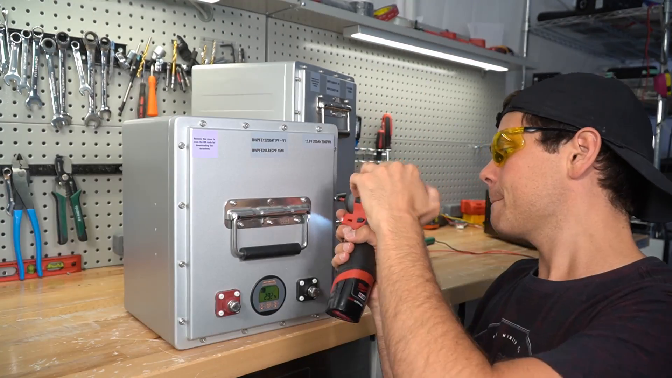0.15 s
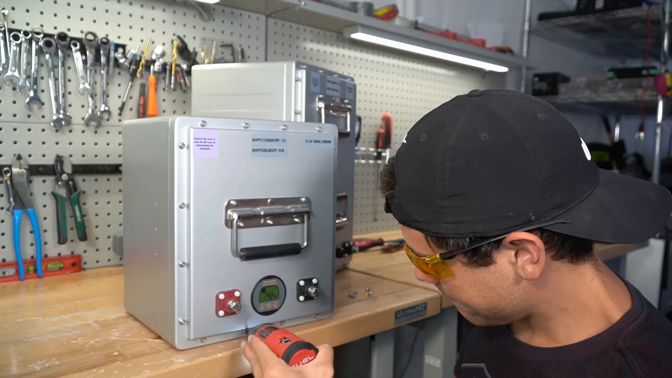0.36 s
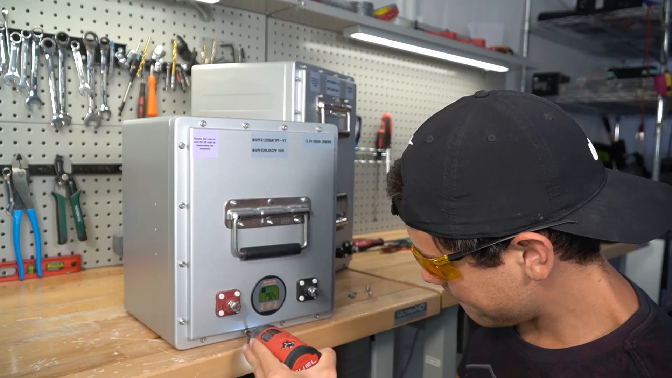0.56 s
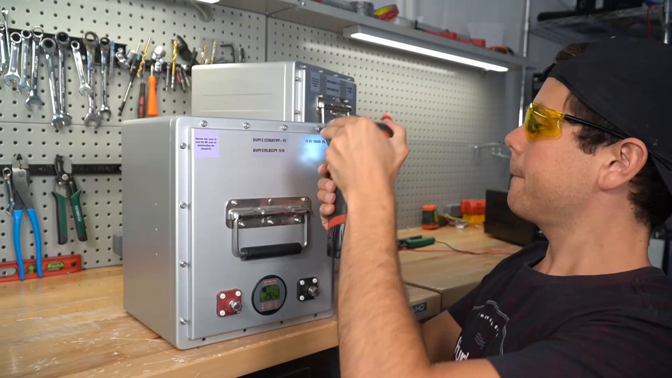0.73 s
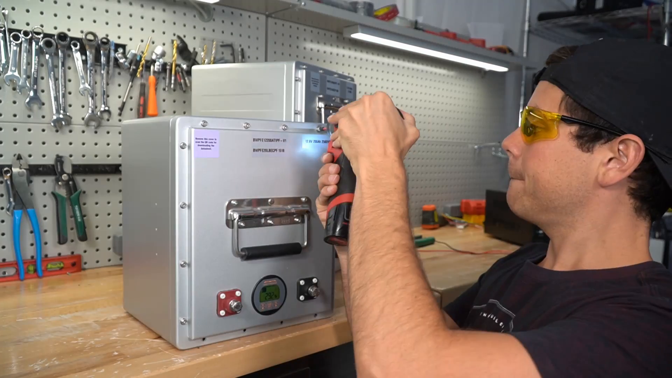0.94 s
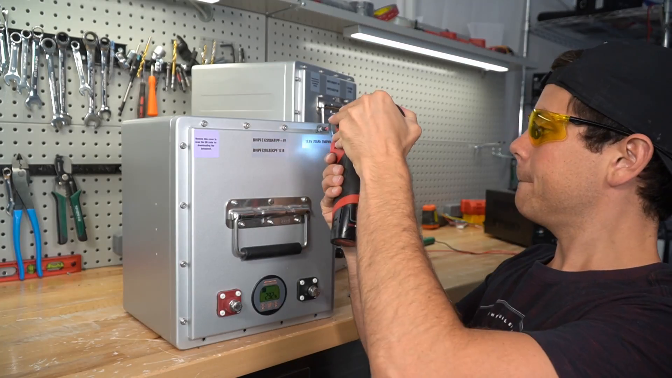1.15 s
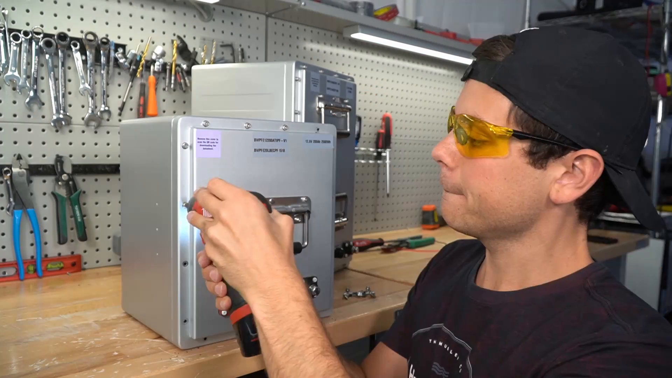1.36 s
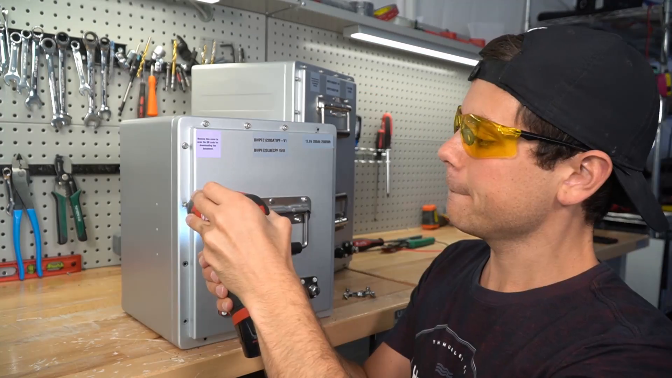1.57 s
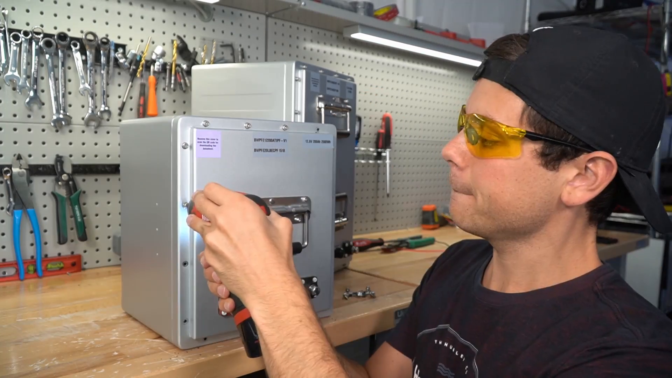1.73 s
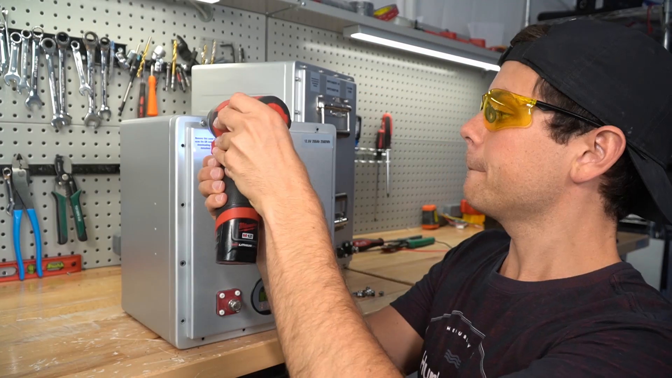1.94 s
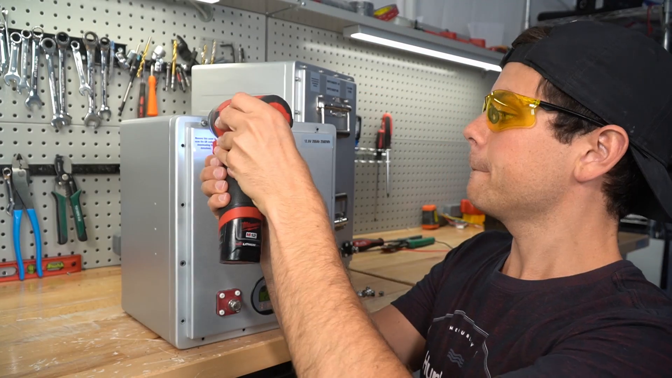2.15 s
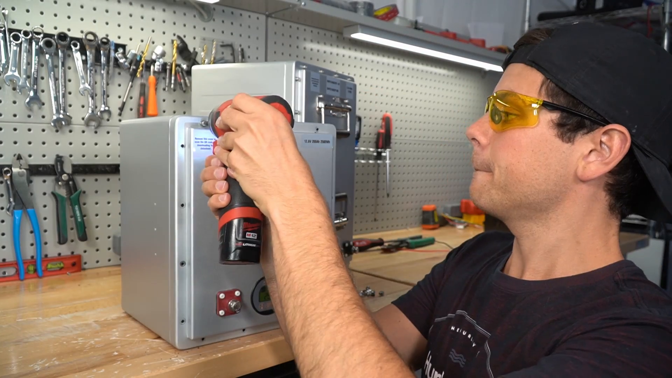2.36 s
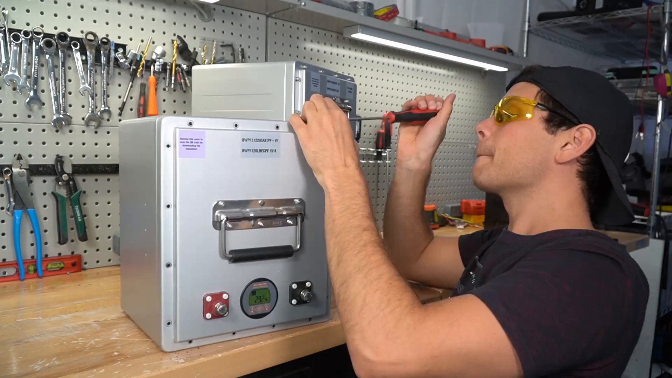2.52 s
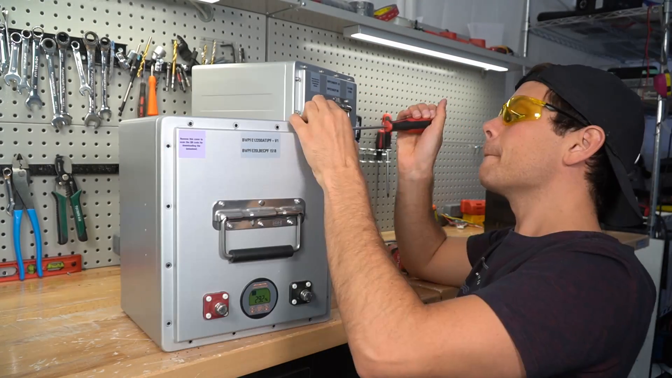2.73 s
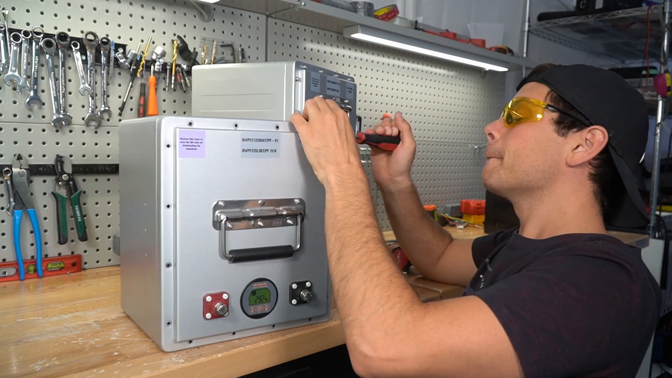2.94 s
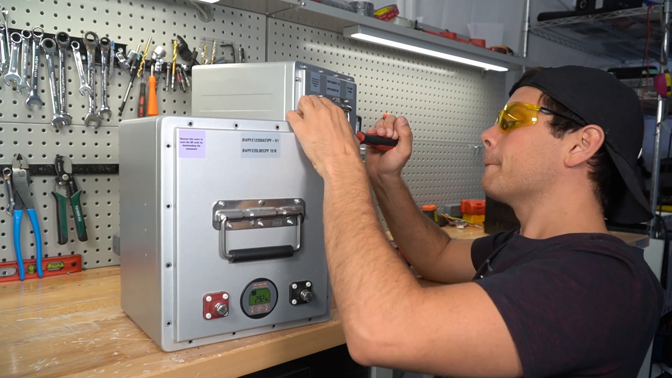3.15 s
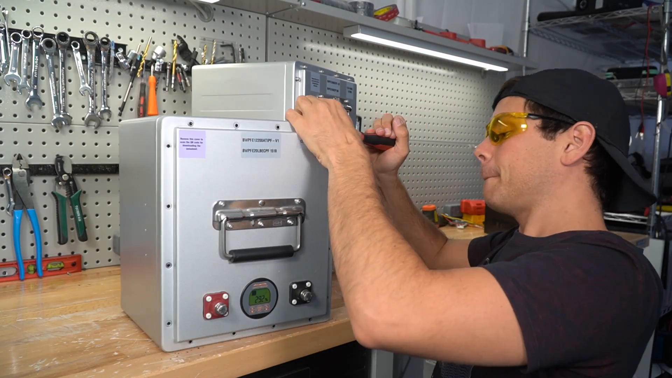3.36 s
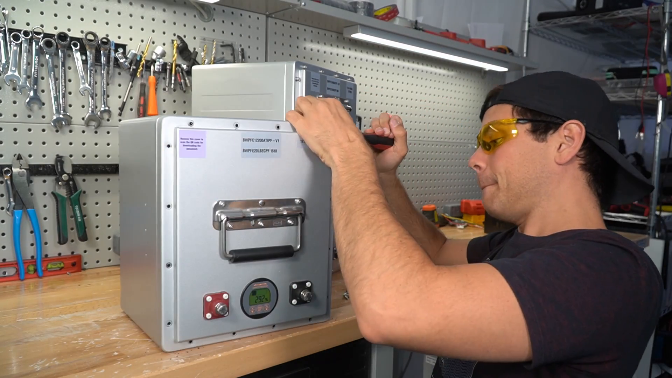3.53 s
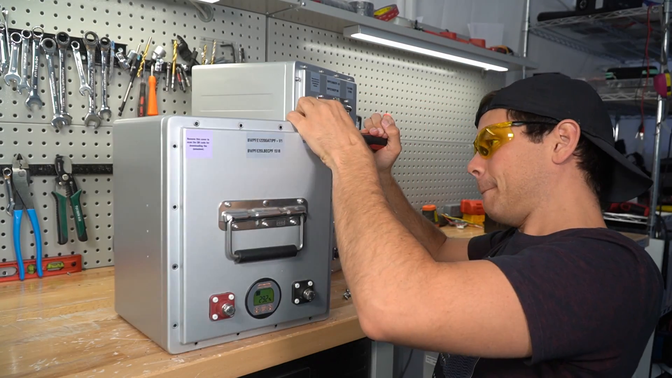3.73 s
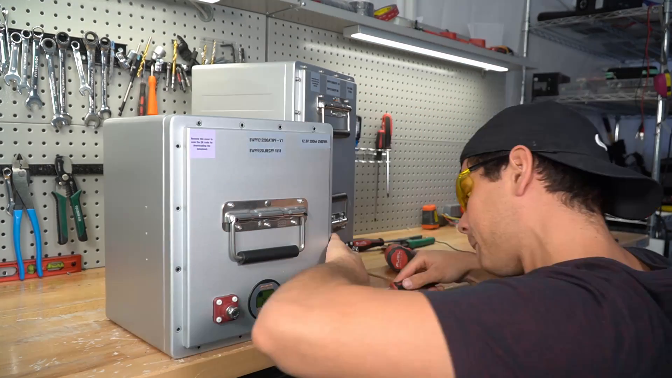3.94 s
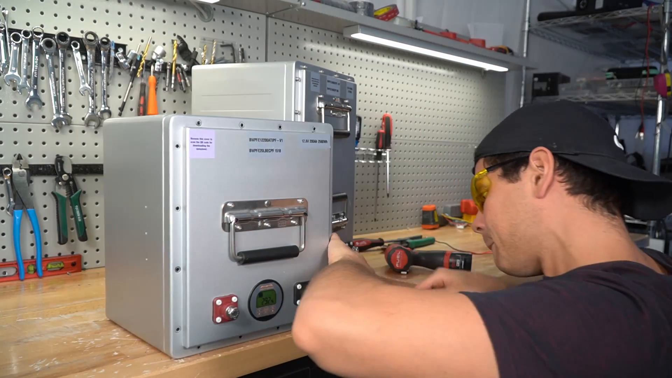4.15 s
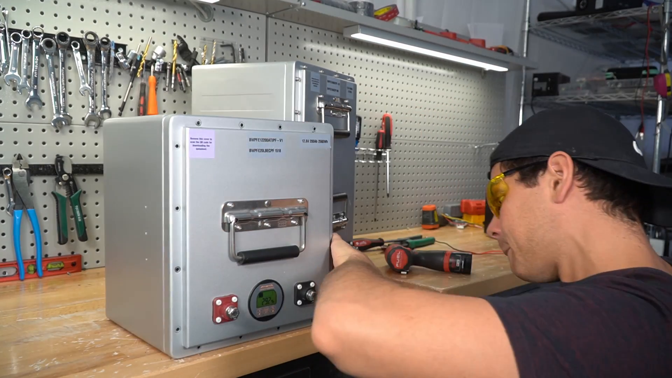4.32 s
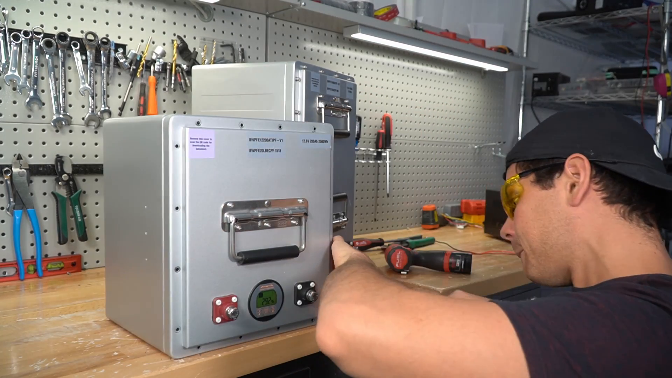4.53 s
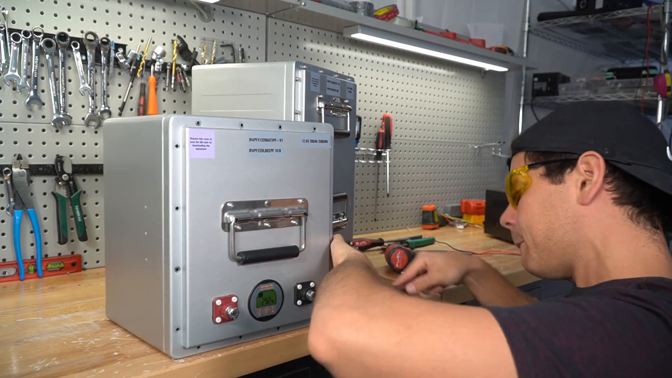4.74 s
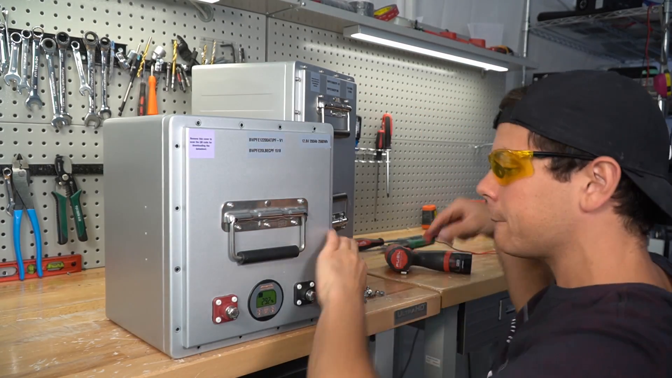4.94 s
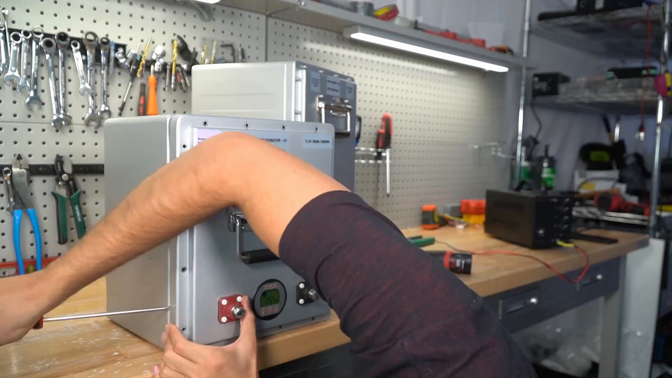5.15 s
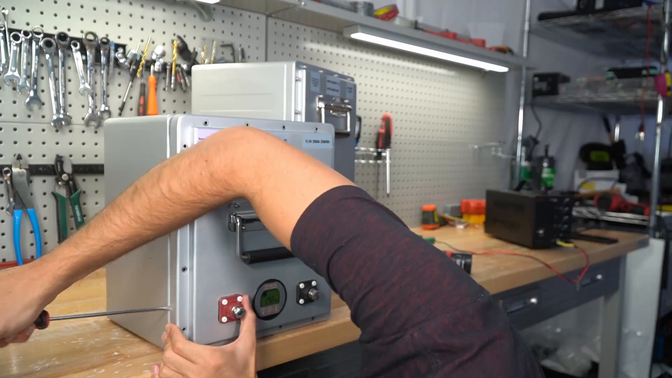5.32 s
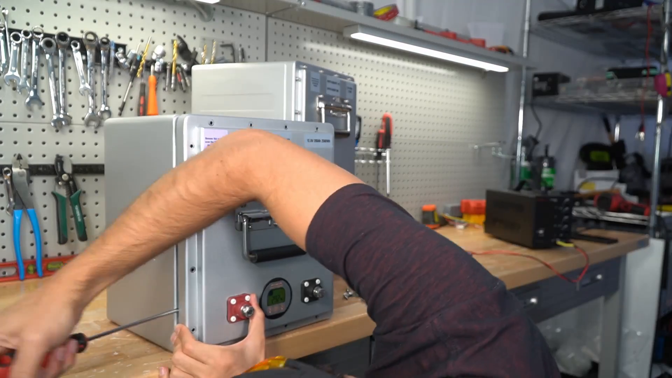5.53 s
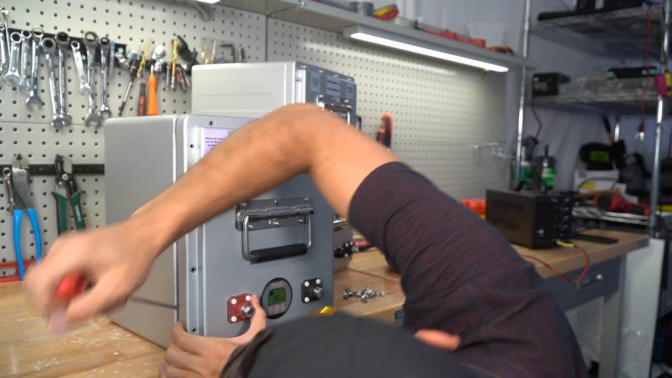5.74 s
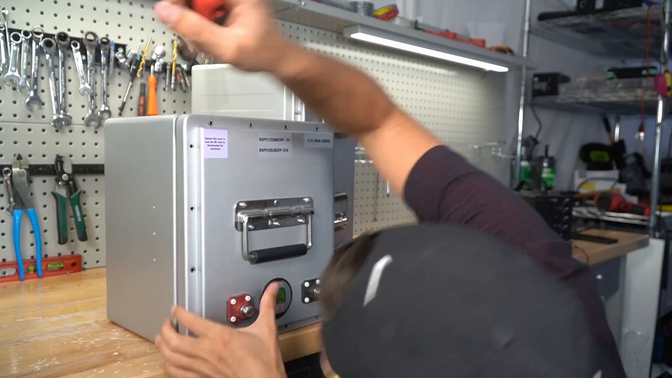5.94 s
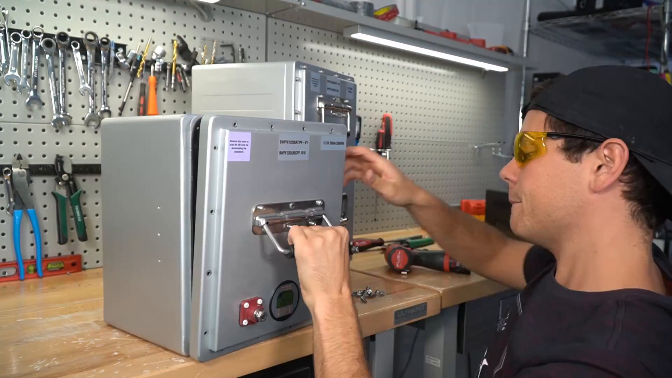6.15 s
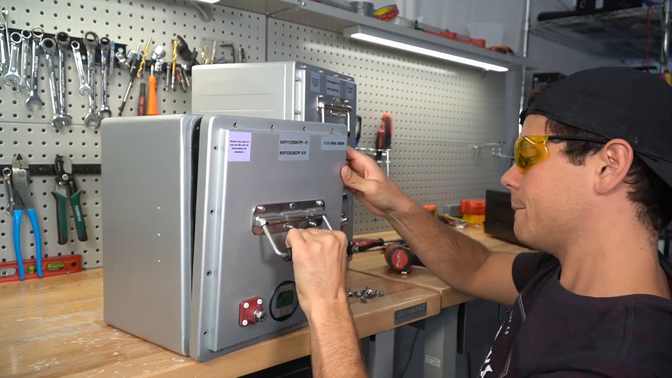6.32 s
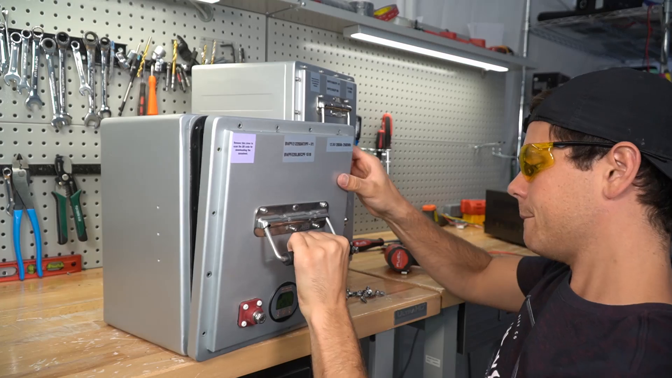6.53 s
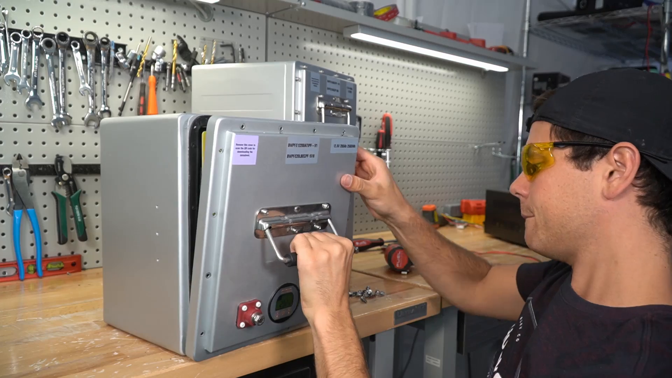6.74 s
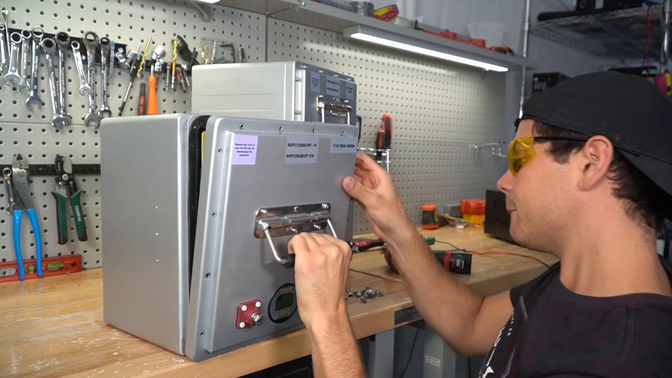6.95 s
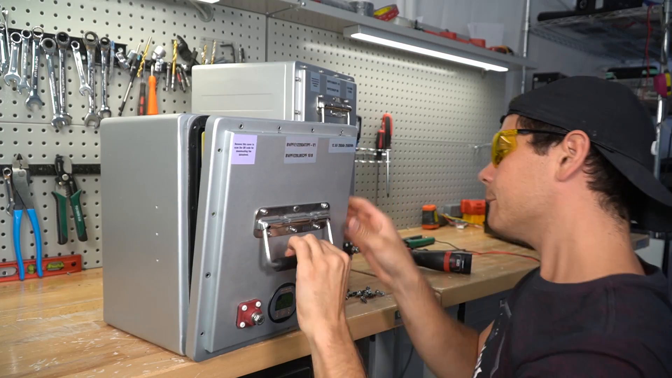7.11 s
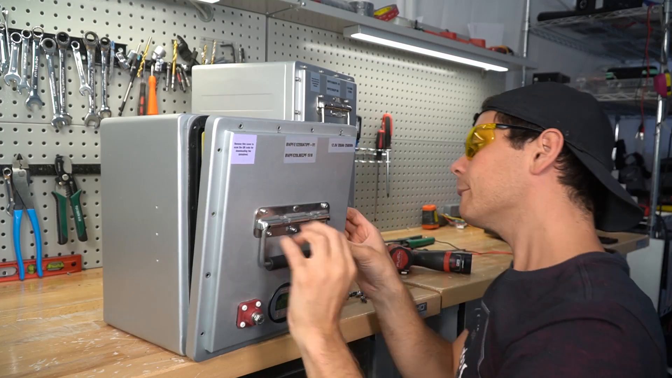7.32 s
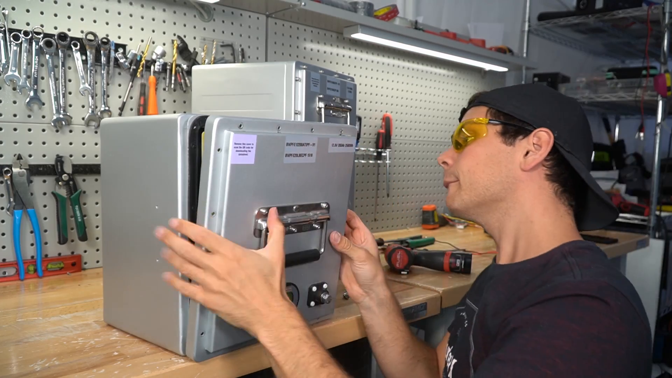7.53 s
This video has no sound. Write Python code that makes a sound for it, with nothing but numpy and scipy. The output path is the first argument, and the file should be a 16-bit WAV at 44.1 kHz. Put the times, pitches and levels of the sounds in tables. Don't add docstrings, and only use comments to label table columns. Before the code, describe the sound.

Five short cordless drill bursts rattle and whine with hard knocks, then a metallic slap, screwdriver taps, dropped screws, prying clicks and a loud panel knock.

```python
import sys
import numpy as np
from scipy import signal
from scipy.fft import rfft, irfft
from scipy.io import wavfile
from scipy.ndimage import uniform_filter1d

SR = 44100
rng = np.random.default_rng(int(sys.argv[2]) if len(sys.argv) > 2 else 0)


def waveform_to_disk(signal):
    frames = np.transpose(np.atleast_2d(signal))
    scaled = np.clip(frames, -1, 1) * 32767
    samples = np.round(scaled).astype(np.int16)
    wavfile.write(sys.argv[1], SR, samples)


def to_linear_factor(level_db):
    exponent = np.asarray(level_db, float) / 20
    return 10 ** exponent


N = 334301


def evened(x):
    return x / np.sqrt(np.mean(x ** 2) + 1e-20)


def read(points, hz):
    f, value = np.transpose(points)
    return np.interp(np.log(hz + 1), np.log(f + 1), value)


def add(mix, s, sound):
    part = mix[round(s * SR):][:len(sound)]
    part += sound[:len(part)]


def band(x, lo_hz, hi_hz):
    sos = signal.butter(2, [lo_hz, min(hi_hz, SR / 2 - 100)], "bandpass", fs=SR, output="sos")
    return signal.sosfilt(sos, x)


def coloured(x, points, peaks=()):
    hz = np.fft.rfftfreq(len(x), 1 / SR)
    db = read(points, hz)
    for f, width, height_db in peaks:
        db = db + height_db / (1 + (2 * (hz - f) / width) ** 2)
    return irfft(rfft(x) * to_linear_factor(db), len(x))


def drift(size, rate_hz):
    low = signal.butter(2, rate_hz, fs=SR, output="sos")
    return evened(signal.sosfilt(low, rng.standard_normal(size + 4000))[4000:])


# f/Hz, level/dB
SHELL = [(59, -21), (100, -2.5), (2900, -0.5), (3750, 8.5), (5200, -0.5), (8300, 1), (10500, -5.5),
         (16000, -21)]
ORDERS_PER_TURN = 9
FULL_MESH_HZ = 2000


def gear_rattle(mesh_hz, turns, colour, panel, hiss):
    size = len(mesh_hz)
    lumps = to_linear_factor(1.0 * drift(size, 69)) * (1 + 0.087 * np.cos(turns / ORDERS_PER_TURN))
    rattle = coloured(coloured(lumps * rng.standard_normal(size), SHELL), colour, panel)
    rumble_gain = 0.87 * (mesh_hz / mesh_hz.max()) ** 5 - 1
    rattle += band(rattle, 70, 660) * np.clip(rumble_gain, -.9, 1)
    hiss_gain = (np.sqrt(mesh_hz / mesh_hz.mean()) - 1) * hiss
    rattle += band(rattle, 3500, 13000) * np.maximum(hiss_gain, -.9)
    return evened(rattle)


ORDERS = [1 / 9, .4, .645, 1, 1.285, 8, 2, 2.36, 2.53, 3, 3.57, 4, 4.5, 5, 6, 7]


def gear_whine(mesh_hz, turns, whine_db, panel, orders_db, least_db):
    size = len(mesh_hz)
    wobble = .44 * np.sqrt(mesh_hz / FULL_MESH_HZ) * drift(size, 45)
    whine = np.zeros(size)
    for order, db in zip(ORDERS, orders_db):
        flicker = to_linear_factor(db + 3.5 * drift(size, 28))
        whine += flicker * np.cos(order * (turns + wobble) + .7 * drift(size, 40))
    whine = evened(coloured(whine, SHELL, panel)) * np.clip(mesh_hz / 400, 0, 1)
    whine /= 1 + np.maximum(np.gradient(mesh_hz) * SR, 0) / 30000
    return whine * (mesh_hz / mesh_hz.max()) ** .8 * to_linear_factor(np.clip(whine_db, least_db, 3.5))


def speed_control(t, mesh_hz, turns):
    commutation = 6 * turns / ORDERS_PER_TURN
    whistle = 0.25 + np.cos(commutation) + 0.2 * np.cos(2 * commutation)
    whistle *= np.cos(2 * np.pi * 9940 * t)
    pull_db = 8 * np.minimum(mesh_hz / 550, 1) ** 2
    full_trigger_db = -20 * (mesh_hz / FULL_MESH_HZ) ** 3
    return whistle * to_linear_factor(-45 + pull_db + full_trigger_db + 2.5 * drift(len(t), 22))


def drill_burst(rows, whine_db, colour, panel, orders_db, hiss, least_db, bit_db):
    s, speed, level_db = np.transpose(rows)
    t = np.arange(s[0], s[-1], 1 / SR)
    whirr_db = np.interp(t, s, level_db)
    mesh_hz = uniform_filter1d(np.interp(t, s, speed), size=900)
    turns = 2 * np.pi * np.cumsum(mesh_hz) / SR
    rattle = gear_rattle(mesh_hz, turns, colour, panel, hiss)
    whine = gear_whine(mesh_hz, turns, whine_db, panel, orders_db, least_db)
    bit_level = to_linear_factor(bit_db + 3 * drift(len(t), 25))
    bit = bit_level * np.cos(2 * np.pi * 3625 * t + 1.2 * drift(len(t), 20))
    body = evened(rattle + whine + bit)
    start_s, stop_s = .008, .003
    fade_in = (t - t[0] + (t[0] < start_s)) / start_s
    edge = np.clip(np.minimum(fade_in, (t[-1] - t) / stop_s), 0, 1)
    return (to_linear_factor(whirr_db) * body + speed_control(t, mesh_hz, turns)) * edge


# t/s, mesh f/Hz, whirr level/dB
BURSTS = [
    [(0, 1456, -17), (.04, 1477, -13.5), (.1, 1495, -19.5), (.14, 1500, -19), (.18, 1340, -19.5),
     (.226, 1272, -20.5)],
    [(.306, 210, -27.5), (.37, 563, -21.5), (.425, 733, -23.5), (.5, 767, -23.5), (.535, 1004, -18),
     (.565, 1624, -17), (.6, 1844, -18.5), (.68, 1969, -19.5), (.768, 1849, -21)],
    [(.918, 616, -24.5), (.975, 1043, -18.5), (1.018, 1329, -17.5), (1.045, 1584, -18.5), (1.11, 1729, -18),
     (1.22, 1840, -19), (1.345, 1713, -19.5), (1.394, 1700, -25)],
    [(1.396, 556, -23.5), (1.49, 587.4, -27), (1.56, 572, -24.5), (1.62, 497.3, -23), (1.655, 548.6, -26.5),
     (1.72, 496.6, -22), (1.755, 574.6, -27.5), (1.8, 567, -23.5), (1.853, 594, -28)],
    [(1.925, 61.1, -54.5), (1.97, 179.9, -33.5), (2.055, 331, -30.5), (2.14, 215.6, -28.5),
     (2.225, 353, -32), (2.29, 302.3, -29), (2.345, 167.7, -31.5), (2.44, 330.8, -29.5),
     (2.563, 164.2, -30)],
]
WHINES_DB = [1.5, -3, -5, -2, -9.4]
# f/Hz, level/dB per Hz
COLOURS = [
    [(100, -28.5), (481, -12.5), (570, -20.5), (910, -2.5), (1280, -9), (1420, -4.5), (1610, -10),
     (16000, -16)],
    [(100, -56), (140, -3), (283, -25), (373, -5), (570, -14.5), (1910, -5.5), (2630, -8.5), (16000, -6.5)],
    [(100, -30), (202, 7.5), (433, -4), (691, -3), (1480, -4), (1800, -0.5), (2930, -9), (16000, -4)],
    [(100, -39.5), (277, -31), (365, -14.5), (910, -10), (1150, -14), (1390, -12), (8280, -10.5),
     (16000, -20.5)],
    [(100, -21), (365, -0.5), (513, 4), (891, -4), (1060, -7.5), (1760, 0), (10000, -7.5), (16000, -32)],
]
# f/Hz, width/Hz, level/dB
PANELS = [
    [(1004, 38, -4.5), (3750, 260, 1), (8300, 1000, 10), (13980, 1400, 11)],
    [(770, 370, 4), (3600, 250, 0), (7930, 620, 3.5), (14300, 1000, 3)],
    [(210, 5.9, 2), (3750, 1600, 8), (8150, 570, 7), (13640, 590, 6.5)],
    [(357, 17.6, 7.5), (1150, 46, 13), (1614, 45, 8.5), (3560, 100, 1), (8430, 1200, 6.5),
     (14500, 2900, 10.5)],
    [(358, 29, 15.5), (885, 63, 14.5), (1260, 150, 6.5), (1770, 29, 16), (3586, 60, 14.5), (2350, 74, 9),
     (14600, 2800, 27)],
]
ORDERS_DB = [
    [-26, -20, -7, 1, -18, -20, 1, -20, -7, 0, -20, -3, -16, -5, -5, -20],
    [-16, -11, -7, -1, -11, -16, -4, -14, -12, 0, -14, -1, -9, -7, -7, -10],
    [-9, -16, -14, 1, -7, -20, -18, -14, -12, -1, -14, 1, -10, -2, -5, -5],
    [-28, -28, -10, -9, -20, -9, -1, -20, -20, -5, -20, -1, -20, -6, -11, -8],
    [-28, -28, -14, -9, -14, -9, -5, -16, -12, -5, -16, -1, -16, -6, -7, -9],
]
HISS = [.8, 0.55, .8, 2.5, 2.1]
LEAST_WHINE_DB = [1.5, .5, .5, 1.5, -2]
BITS_DB = [-30, -30, -30, -22, -10]


def drill():
    out = np.zeros(N)
    for settings in zip(BURSTS, WHINES_DB, COLOURS, PANELS, ORDERS_DB, HISS, LEAST_WHINE_DB, BITS_DB):
        add(out, settings[0][0][0], drill_burst(*settings))
    return out


# f/Hz, level/dB per Hz
AIR = [(12, -29.5), (20, -0.5), (113, -2), (301, -5), (422, -5.5), (574, -9), (678, -8), (825, -17.5),
       (923, -14), (1570, -25.5), (4420, -34), (14700, -41.5), (16000, -33)]


def shop_air():
    air = to_linear_factor(-54.5 + 2.0 * drift(N, 1.7)) * evened(coloured(rng.standard_normal(N), AIR))
    whistle = np.cos(2 * np.pi * 15650 * np.arange(N) / SR)
    return air + to_linear_factor(-82 + 3 * drift(N, 20)) * whistle


# peak t/s, rise t/s, fall t/s, rustle level/dB, brightness level/dB
STROKES = [(0.234, 0.037, 0.069, -52.5, 3), (1.858, 0.014, 0.085, -49, -5.5),
           (2.592, 0.074, 0.014, -51.5, -4.5), (2.661, 0.045, 0.011, -43, 2),
           (2.931, 0.12, 0.085, -35, -0.5), (2.825, 0.028, 0.038, -45, 7), (3.049, 0.051, 0.088, -64, -5),
           (3.77, 0.26, 0.3, -47.5, -5), (3.963, 0.027, 0.027, -37.5, -7), (4.02, 0.025, 0.081, -41, -21),
           (4.219, 0.011, 0.082, -37.5, -4.5), (4.71, 0.39, 0.006, -50, -9), (4.9, .03, 1, -64.5, 3.5),
           (5.258, .03, 0.23, -52.5, -22), (5.476, 0.05, 0.026, -49, -3), (5.559, 0.028, 0.039, -45.5, -7),
           (5.795, 0.019, 0.015, -42, -9), (5.95, 0.33, 0.9, -68.5, 8), (6.177, 0.027, 0.12, -29, -55),
           (6.28, 0.063, 0.33, -41.5, -26), (7.01, 0.064, 0.059, -48, -9),
           (7.089, 0.049, 0.083, -50.5, 1.5), (7.2, 0.095, 0.056, -44.5, -3.5),
           (7.295, 0.024, 0.045, -44, 5)]
# f/Hz, level/dB per Hz
RUSTLE = [(240, -19), (400, 1), (598, -3.5), (676, -13.5), (801, -9), (2750, -14), (16000, -38)]
# f/Hz, width/Hz, level/dB
SCRAPED = [(700, 90, 1.5), (1150, 230, -0.5), (2380, 92, 1.5), (3750, 120, -17.5)]


def hands():
    grains = to_linear_factor(3 * np.minimum(rng.exponential(1, N), 4)) * (rng.random(N) < 900 / SR)
    friction = 1 + 0.67 * signal.lfilter([1], [1, -.99], grains)
    rub = rng.standard_normal(N) * friction * to_linear_factor(0.43 * drift(N, 27))
    rub = coloured(rub, RUSTLE, SCRAPED)
    body = evened(band(band(rub, 460, 2660), 460, 2660))
    top = evened(band(rub, 1800, 10000))
    out = np.zeros(N)
    for s, rise, fall, level_db, bright_db in STROKES:
        first, last = round((s - 2 * rise) * SR), round((s + 2 * fall) * SR)
        span = np.arange(max(first, 0), min(last, N))
        away = np.maximum((s - span / SR) / rise, (span / SR - s) / fall)
        out[span] += to_linear_factor(level_db - 21 * away) * (body[span] + to_linear_factor(bright_db) * top[span])
    return out


def rise(t, s):
    return 1 - np.exp(-t / s)


def peaked(x):
    return x / abs(x).max()


def metal_modes(t, t60, modes):
    metal = np.zeros(len(t))
    for hz, db, long in modes + modes:
        level = to_linear_factor(db + 1 * rng.standard_normal() - 60 * t / (5 * t60 * min(long, .6)))
        detune = 1 + 0.033 * rng.uniform(-0.87, 1)
        metal += level * np.sin(2 * np.pi * hz * detune * t + 6 * rng.random())
    return metal


def hit(peak_db, ring_hz, bright_db, t60, modes, seat_db, ring_db, metal_db, air_db, swell_s):
    t, t60 = np.arange(SR // 2) / SR, max(t60, .02)
    noise = rng.standard_normal((4, len(t)))

    def fall(share):
        return to_linear_factor(-60 * t / (share * t60))

    peaks = []
    for hz, db, _ in modes:
        height_db = max(11 + .5 * db, 4) * rng.uniform(.5, 1.2)
        peaks.append((hz * rng.uniform(.98, 1.02), 60 + .03 * hz, height_db))
    rattle = evened(coloured(noise[0], [(3000, -11.0), (16000, -10.5)], peaks))
    shaken = rattle * (fall(0.98) + 1.2 * fall(0.073))
    shaken += 6 * noise[2] * fall(0.03)
    shaken += to_linear_factor(metal_db + 1.5 * drift(len(t), 40)) * metal_modes(t, t60, modes)
    ring = evened(band(noise[1], ring_hz * .95, ring_hz * 1.05)) * fall(.7)
    dull_hz = np.clip(4600 * to_linear_factor(0.26 * bright_db), 1500, 4000)
    body = band(shaken, 580, dull_hz) + to_linear_factor(ring_db) * ring
    top = band(band(shaken, 2800, 9500), 800, 8700) * fall(1.6)
    top += to_linear_factor(air_db + .3 * peak_db) * band(noise[2], 7300, 15000) * fall(0.39)
    thud_db = -33.5 + seat_db - 0.51 * peak_db + 1.89 * max(-33 - bright_db, 0)
    thud = evened(band(band(noise[3], 130, 480), 130, 480)) * fall(1.4) * rise(t, 0.00089)
    sharp = rise(t, np.clip(.0001 * to_linear_factor(-.3 * peak_db), .0001, .0004) + swell_s)
    tick = to_linear_factor(0.5 + .3 * min(bright_db, 0) - 6500 * swell_s) * np.exp(-t / 0.00018)
    tick *= np.sin(2 * np.pi * 3000 * t)
    crack = (peaked(body) + to_linear_factor(bright_db) * peaked(top)) * sharp
    return to_linear_factor(peak_db) * (tick + crack + to_linear_factor(thud_db) * peaked(thud))


# thud level/dB, ring level/dB, modes level/dB, airy crack level/dB, extra rise t/s
KINDS = [
    (-3, -8.5, -23, -2.5, 0.0008),
    (-5.5, -9, -16.5, -3.5, 0.0012),
    (5, -8, -5, -21, 0.00051),
    (-7, -3.5, -13.5, -18, 0.0004),
    (3, -8, -16.5, -6.5, 0.001),
    (2.5, -5, -20.5, -8.5, 0.0014),
    (-9, -3, -25.5, -22.5, 0.0027),
    (5.5, -13, -19, -9.5, 0.00019),
    (9.5, -10, -19.5, -28, 0.0038),
]


def blows(rows, modes, kind):
    out = np.zeros(N)
    for s, *blow in rows:
        add(out, s, hit(*blow, *modes_and_kind(modes, kind)))
    return out


def modes_and_kind(modes, kind):
    return (modes, *KINDS[kind])


# t/s, peak level/dB, ring f/Hz, brightness level/dB, t60 t/s
JOLTS = [
    (0.361, -0.5, 700, 5, 0.13),
    (0.369, -37, 765, 9, 0.29),
    (0.846, -37.5, 398, -2.5, 0.37),
    (1.014, -12.5, 3750, 19.5, 0.055),
    (1.351, 3.5, 360, -46.5, 0.084),
    (1.413, 4, 1110, -9, 0.13),
    (1.937, -32, 2490, -1, .08),
    (1.963, -28, 2500, 8, 0.069),
]
# f/Hz, level/dB, t60 t/s
TOOL = [(660, -12, 0.056), (1150, -14.5, 0.048), (1756, -11, 0.035), (2380, -7.5, 0.019),
        (2720, -16.5, 0.094), (3220, -9, 0.089), (3625, 2.5, 0.023), (4380, -6, 0.062), (5380, -10, 0.039),
        (6280, -8, 0.17), (7200, -3.5, 0.021), (8800, -1.5, 0.078)]


def drill_jolts():
    return blows(JOLTS, TOOL, 0)


# t/s, peak level/dB, ring f/Hz, brightness level/dB, t60 t/s
NUDGES = [
    (2.627, -33, 700, -12, 0.22),
    (2.818, -18, 2400, -5.5, 0.52),
    (2.89, -16.5, 3790, -4, .15),
    (2.913, -17, 1150, -24, 0.1),
    (2.93, -23.5, 2600, -18.5, 0.11),
    (6.344, -24, 2195, -5, 0.094),
    (6.398, -22.5, 840, -38.5, 0.097),
    (7.076, -31.5, 667, -20, 0.085),
    (7.159, -31, 735, -2, 0.16),
    (7.289, -25, 2380, -8, 0.13),
]
# f/Hz, level/dB, t60 t/s
CASE = [(220.4, 5.5, 0.9), (604, -2, 0.33), (660, -12.5, .8), (923, -9.5, .7), (1260, -23.5, 0.72),
        (1500, -12, 0.7), (1820, 1, 0.22), (2220, -9, 0.16), (2950, -7, 0.2), (3800, -23.5, 0.32),
        (4930, -15, 0.11)]


def nudges():
    return blows(NUDGES, CASE[1:], 6)


# f/Hz, t60 t/s
SHOP = [(200, 1), (1000, 0.72), (4000, 0.35), (12000, 0.38)]


def shop_reflections(x):
    taps = np.zeros(SR // 2)
    at = np.arange(300, len(taps) - 20, 20)
    taps[at + rng.integers(0, 20, len(at))] = rng.choice([-1., 1.], len(at))
    hz, t, z = signal.stft(taps, SR, nperseg=256)
    decay = to_linear_factor(-60 * t / read(SHOP, hz)[:, None])
    tail = signal.istft(z * decay, SR, nperseg=256)[1]
    return signal.fftconvolve(x, tail / np.linalg.norm(tail))[:N]


# t/s, peak level/dB, ring f/Hz, brightness level/dB, t60 t/s
SLAP = [
    (2.67, 3.5, 1100, -2.5, 0.1),
    (2.673, 1.5, 1720, -5, .16),
    (2.684, -6.5, 5200, 0.5, .2),
    (2.981, -8, 2300, -7.5, 0.098),
]
# f/Hz, level/dB, t60 t/s
EDGE = [(557, -12.5, .2), (1100, -11.5, 0.063), (1750, -9.5, 0.097), (2340, -8.5, .15), (2800, -4, 0.16),
        (3030, -10, .14), (3836, -3, 0.062), (5200, 0.5, 0.046), (6340, -3.5, 0.079), (6900, -1, .07),
        (8500, -8, 0.13)]


def lid_slap():
    return blows(SLAP, EDGE, 1)


# t/s, peak level/dB, f/Hz, t60 t/s
BUMPS = [
    (4.2, -45, 105, 0.46),
    (4.6, -45, 90, 0.18),
    (5.2, -42, 124.4, 0.19),
    (5.488, -35, 120.3, 0.15),
    (5.795, -36.5, 155, 0.19),
    (2.675, -34.5, 125.7, 0.24),
]


def bench_bumps():
    out, t = np.zeros(N), np.arange(SR // 2) / SR
    for s, peak_db, hz, t60 in BUMPS:
        swing = np.sin(2 * np.pi * hz * t) * np.minimum(t / 0.0055, 1)
        add(out, s, to_linear_factor(peak_db - 60 * t / t60) * swing)
    return out


# t/s, peak level/dB, ring f/Hz, brightness level/dB, t60 t/s
SCREWDRIVER = [(3.915, -31.5, 640, -32, 0.24), (3.975, -8, 805, -27, 0.081),
               (4.089, -21.5, 920, -23, 0.091), (4.164, -33.5, 573, -6, 0.47),
               (4.217, -21, 663, -17.5, 0.11), (3.756, -34, 1500, -12, 0.098), (3.94, -38, 1000, -5, .1),
               (3.957, -37, 1500, -10, 0.043), (4.236, -28, 2230, 1, .06), (4.263, -20, 700, -18, 0.31),
               (4.444, -45, 712, -10.5, 0.12)]


def screwdriver():
    return blows(SCREWDRIVER, TOOL, 2)


# t/s, peak level/dB, ring f/Hz, brightness level/dB, t60 t/s
SCREWS = [
    (4.679, -30, 704, -7, 0.13),
    (4.704, -22.5, 1260, -12, 0.082),
    (4.727, -13, 1230, 0, 0.19),
    (4.746, -16.5, 1150, 1, 0.15),
    (4.757, -20, 4600, -2, 0.11),
    (4.783, -2.5, 3740, -8, 0.13),
    (4.837, -16, 3600, 5.5, 0.14),
    (4.944, -33.5, 1010, -13, 0.18),
]
# f/Hz, level/dB, t60 t/s
PILE = [(666, -4, 0.17), (1298, -3.5, 0.14), (1700, -7, 0.082), (2220, 7, 0.13), (2860, -1, 0.11),
        (3750, 6, .07), (4800, 3, 0.078), (5850, 0.5, 0.097), (7460, -19, .08), (8660, -40, .08)]


def dropped_screws():
    return blows(SCREWS, PILE, 3)


# t/s, peak level/dB, ring f/Hz, brightness level/dB, t60 t/s
PRYING = [(5.19, -11, 528, -11, 0.14), (5.299, -45, 508, -6, 0.043), (5.39, -59.5, 6900, 2.5, 0.041),
          (5.43, -46, 2000, 2, .05), (5.463, -35.5, 3400, 2, 0.15), (5.484, -15.5, 1160, -7, 0.19),
          (5.498, -12.5, 1260, -14, 0.096), (5.549, -32, 470, -1, 0.099), (5.793, -20.5, 770, -11.5, 0.08),
          (5.804, -20.5, 4590, -9, 0.1), (5.953, -36.5, 1515, -5.5, 0.58)]


def prying():
    return blows(PRYING, TOOL, 4)


# t/s, peak level/dB, ring f/Hz, brightness level/dB, t60 t/s
PULLING = [
    (6.149, -15, 1500, -38.5, 0.11),
    (6.215, -9.5, 1500, 3.5, 0.08),
    (6.247, -16.5, 435, -3.5, 0.18),
    (6.326, -19.5, 2250, 1, 0.09),
    (6.389, -22, 3830, 3, 0.13),
    (6.6, -23, 980, -3.5, 0.13),
    (6.753, -30, 980, -29.5, 0.065),
    (6.774, -19, 2980, 2, 0.1),
    (6.974, -34, 972, -2, 0.26),
    (7.18, -32, 1820, -29, 0.13),
]


def pulling():
    return blows(PULLING, CASE[1:], 5)


# t/s, peak level/dB, ring f/Hz, brightness level/dB, t60 t/s
SLAM = [
    (7.312, 8.9, 1789, -13, 0.18),
    (7.317, 0.87, 660, -8.5, 0.37),
]


def panel_slam():
    return blows(SLAM, CASE, 7)


# t/s, peak level/dB, ring f/Hz, brightness level/dB, t60 t/s
SHUDDER = [
    (7.335, -0.5, 590, -15, 0.4),
]


def panel_shudder():
    return blows(SHUDDER, CASE, 8)


def scene():
    close = drill() + drill_jolts()
    taps = nudges() + lid_slap() + bench_bumps() + screwdriver() + dropped_screws()
    taps += prying() + pulling() + panel_slam() + panel_shudder()
    return (close + taps + to_linear_factor(-14.5) * shop_reflections(taps) + hands() + shop_air())[None]


def roll_off(x):
    return signal.sosfilt(signal.butter(12, 16280, fs=SR, output="sos"), x)


def record(dry):
    soft = signal.oaconvolve(dry, signal.firwin(301, 15750, fs=SR)[None], "same")
    return roll_off(np.clip(soft, -1, 1))


dry = scene()
out = record(dry)
waveform_to_disk(out)
```